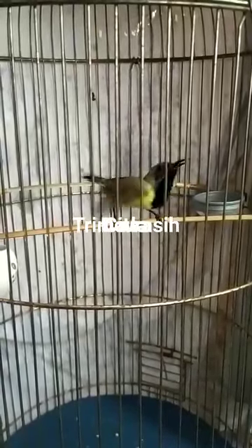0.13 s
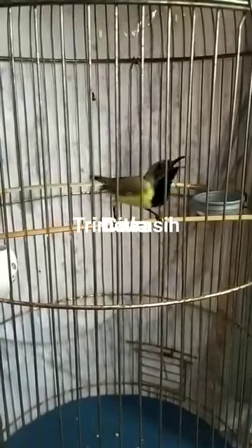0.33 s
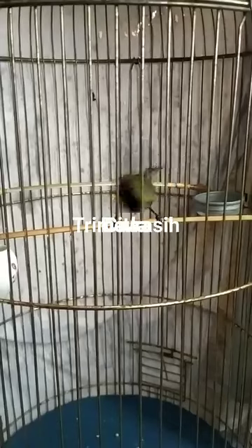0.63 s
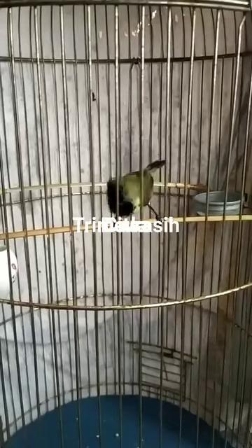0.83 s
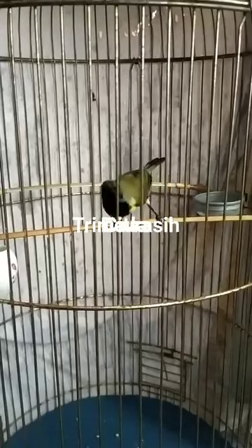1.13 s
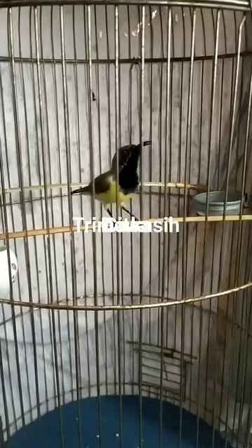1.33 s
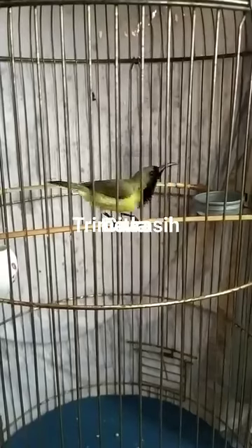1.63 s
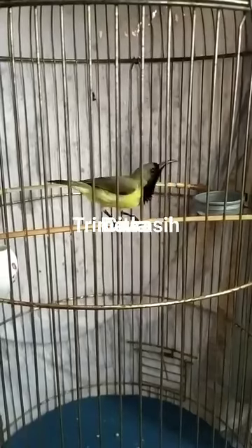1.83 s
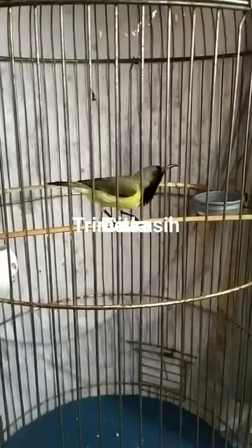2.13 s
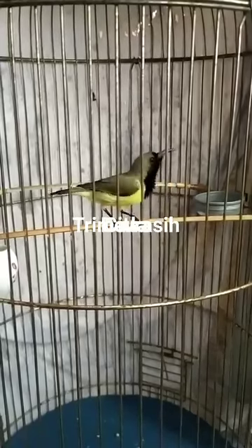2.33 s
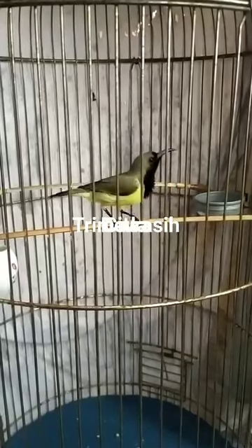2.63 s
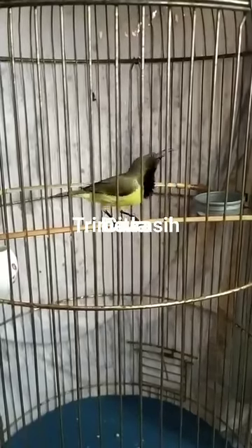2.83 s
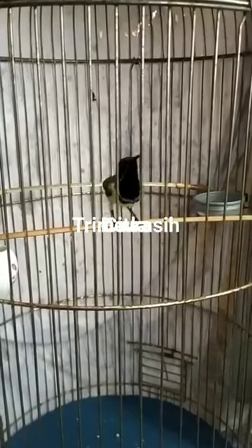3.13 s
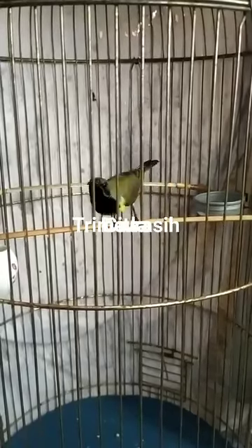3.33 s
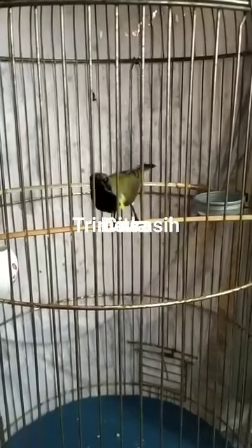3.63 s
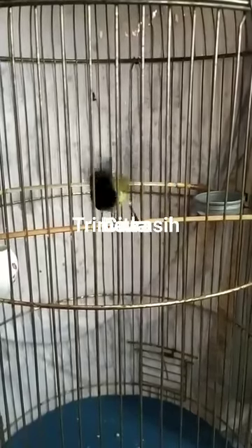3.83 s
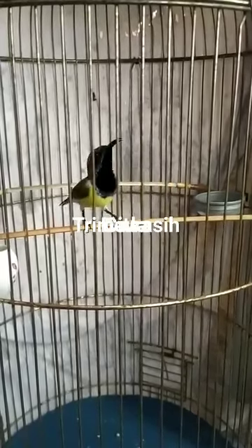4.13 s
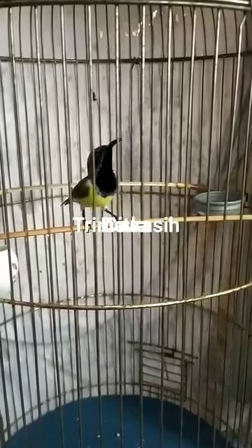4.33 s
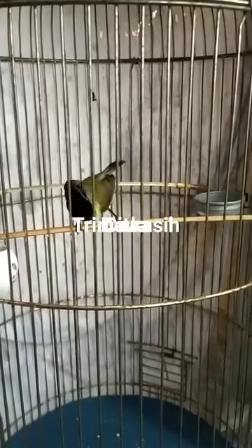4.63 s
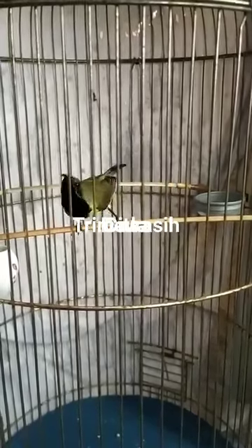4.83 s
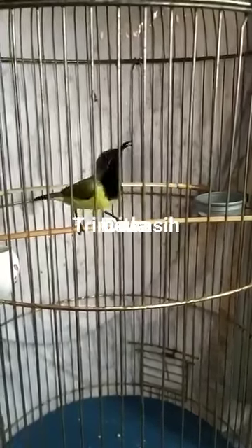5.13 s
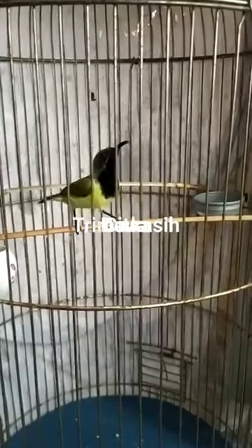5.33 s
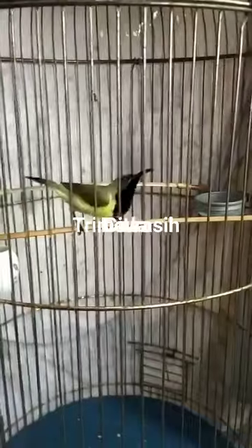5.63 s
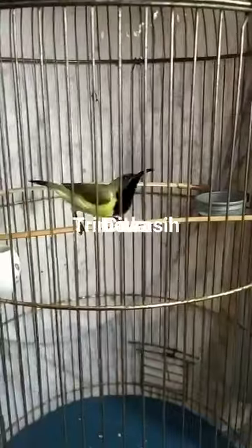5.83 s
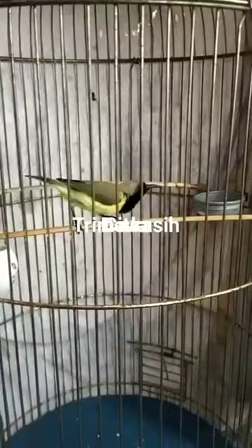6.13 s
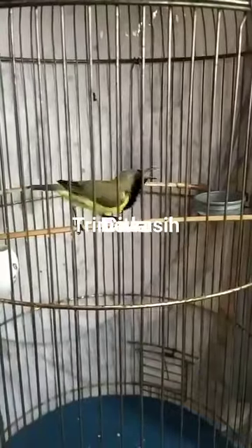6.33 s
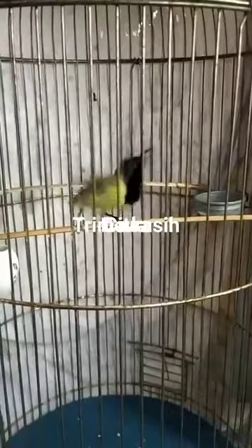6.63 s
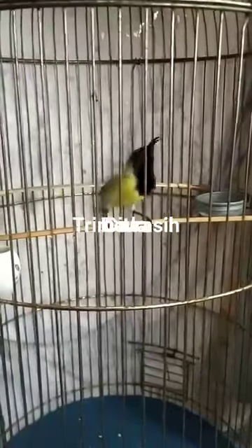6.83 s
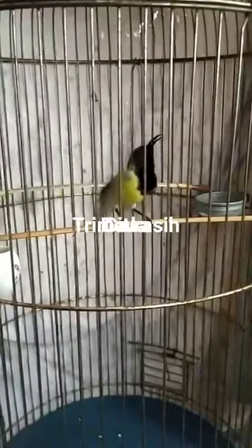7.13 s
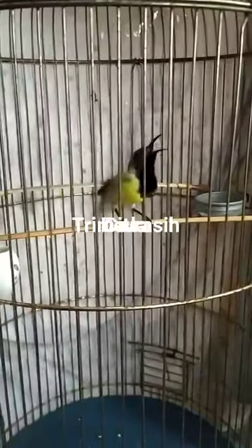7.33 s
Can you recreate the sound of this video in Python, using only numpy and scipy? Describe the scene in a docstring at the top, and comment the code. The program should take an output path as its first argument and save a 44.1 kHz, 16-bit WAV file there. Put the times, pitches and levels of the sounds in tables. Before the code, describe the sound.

A tiny bird sings close by in a small hard room. A loud, rapid, slightly raspy trill comes first, then a sharp chip among a run of soft falling chirps. More single chips follow, spaced out, over faint wavering whistles that break into hiss. A scratchy squeak leads into a second loud trill that lasts to the end. Low steady rumble and thin hiss lie underneath; close stereo microphone.

```python
"""A sunbird in a wire cage, close to a wall, sings two fast trills with sharp single chips between them.
Trills, chips and a squeak are nearly pure tones swept in pitch, with a rasp of air or harsh noise on many.
Also between the trills come soft falling chirps, and three whistles whose tone breaks up into hissing noise.
A small hard room adds random echoes, over a steady low rumble with a thin hiss, a rustle and a faint hum."""
import sys
import numpy as np
from scipy import signal
from scipy.fft import rfft, irfft
from scipy.io import wavfile
from scipy.ndimage import uniform_filter1d

SR = 44100
rng = np.random.default_rng(int(sys.argv[2]) if len(sys.argv) > 2 else 0)


def transcribe(signal):
    """Save signal, clipped to [-1, 1], as a 16-bit WAV file at the path in sys.argv[1]."""
    frames = np.atleast_2d(signal).T
    limited = np.clip(frames, -1, 1)
    pcm = np.round(limited * 32767).astype(np.int16)
    wavfile.write(sys.argv[1], SR, pcm)


N = 329868
TIME = np.arange(N) / SR

# trill syllables, in two groups: [t/s, top f/Hz, length/s]
TRILL_SYLLABLES = [(.030, 6900, .043), (.112, 6980, .042), (.193, 7000, .039), (.274, 6920, .043),
                   (.355, 6900, .044), (.437, 6850, .041), (.520, 6830, .042), (.611, 6650, .042),
                   (6.725, 6050, .036), (6.800, 6550, .038), (6.872, 7000, .037), (6.946, 7200, .039),
                   (7.022, 7270, .040), (7.098, 7250, .040), (7.173, 7250, .039), (7.248, 7280, .034),
                   (7.325, 7260, .044), (7.402, 7270, .036)]
# echo from cage and wall as the bird turns: [t/s, echo level/dB against the direct sound]
TURNING_ECHO = [(.4, -3.5), (.61, -3.5), (6.73, -6), (6.87, -0.5)]
# single chips: [t/s, relative level/dB, left over right/dB, phase lag of the right side/rad]
SINGLE_CHIPS = [(1.445, -11, 6, .9), (2.467, -11, 2.7, .8), (3.027, -11, 3.6, .6), (3.775, -12, 4.3, -2.3),
                (4.096, -11, 5.5, .2), (4.641, -15, 1.6, -2.5), (5.253, -13.3, 7.2, .1),
                (5.692, -12, 7, .1)]
# faint partials of a chip: [pitch factor, level/dB against the main tone]
FAINT_PARTIALS = [(0.348, -33), (1.659, -39.5), (2.301, -28.5)]
# a scratchy squeak in two parts: [t/s, level/dB, top f/Hz, length/s, pitch jitter as a share of f]
SQUEAK_PARTS = [(6.459, -27, 5750, .026, .09), (6.51, -18, 6400, .044, .014)]
# sweep shapes of the syllables, chips, falling chirps and squeak:
# [share of the length, pitch factor, relative level/dB]
SYLLABLE_SWEEP = [(0, .72, -6), (.07, .87, 0), (.17, .985, -1), (.3, 1, 1), (.48, .925, 2),
                  (.63, .815, 5.5), (.8, .69, 0), (1, .58, -12)]
CHIP_SWEEP = [(0, 1.06, -19), (.13, 1.0, -12), (.28, .915, -3), (.43, .895, 2.5), (.58, .925, -3),
              (.76, .985, -1), (1, 1.03, -9)]
FALLING_SWEEP = [(0, 1.06, -14), (.18, .98, 0), (.42, .84, 4), (.62, .75, -6), (1, .52, -16)]
SQUEAK_SWEEP = [(0, .78, -14), (.25, .88, -4), (.42, .97, 3), (.58, 1, -5), (.74, .96, 2), (1, .8, -6)]
# colour of the air that rasps along with a note: [f/Hz, relative level/dB per Hz]
RASP_COLOUR = [(700, -10), (2100, -4), (3700, -8), (5500, -4), (8000, -17), (10000, 1), (11000, -34.5),
               (13000, -3), (15000, -44)]
# starts of the falling chirps, a run that slows: [t/s]
CHIRP_TIMES = [1.383, 1.498, 1.589, 1.695, 1.794, 1.901, 2.008, 2.116, 2.231, 2.345, 2.468, 2.609]
# course of each of the three whistles: [t/s, f/Hz, relative level/dB, hoarseness 0-1]
WHISTLE_COURSES = [
    [(2.972, 2900, -42, .25), (3.05, 3720, -39, .3), (3.095, 3230, -36, .2), (3.17, 3450, -37, .12),
     (3.24, 2920, -39, .15), (3.3, 3200, -35, .08), (3.395, 3270, -34, .1), (3.46, 2950, -39, .7),
     (3.62, 2560, -39, .9), (3.8, 2750, -39, .95), (3.91, 3230, -37, .45), (4.025, 3200, -37, .35),
     (4.08, 3350, -45, .9), (4.16, 3250, -37, .6), (4.21, 2580, -42, .55), (4.29, 2460, -41, .3),
     (4.4, 2450, -48, .95), (4.55, 2650, -40, .4), (4.59, 2950, -43, .9), (4.76, 2720, -42, .8),
     (4.845, 1350, -54, .2)],
    [(5.154, 3050, -39, .25), (5.19, 3400, -32, .15), (5.248, 4200, -35, .25), (5.29, 3600, -29, .25),
     (5.345, 3600, -30, .4), (5.4, 3850, -31, .6), (5.52, 4350, -33, .95), (5.58, 4500, -48, 1)],
    [(5.855, 2400, -43, .3), (5.88, 3000, -29, .2), (5.93, 3150, -31, .7), (6.04, 4250, -35, .85),
     (6.19, 4250, -34, .9), (6.3, 3700, -34, .95), (6.6, 3300, -33, .95), (6.68, 2900, -48, 1)],
]
# where the whistles seem to come from: [t/s, left over right/dB]
WHISTLE_SIDES = [(3.3, -3.5), (4.3, -2), (5.2, -6), (5.5, 2.5), (5.88, -2), (6.15, 3.5), (6.4, -2.5)]
# escaping air: [start t/s, end t/s, break-up t/s, break-up length/s, relative level/dB, rise to the end/dB]
AIR_LEAKS = [(2.968, 4.89, 3.04, .12, -53, -1), (5.176, 5.585, 5.2, 0.13, -34.5, 1.5),
             (5.847, 6.689, 5.69, 0.14, -37.5, 6.5)]
# colour of hissing air, also used for the rustle and background: [f/Hz, relative level/dB per Hz]
HISS_COLOUR = [(400, -21.5), (1100, -13.5), (1700, -21.5), (2600, -8.5), (4700, -3), (7300, -9),
               (10000, -8), (12400, -18.5), (13600, -54)]
# how the echo tail dies away: [f/Hz, time to fall by 60 dB/s]
ROOM_DECAY = [(3000, 0.64), (6000, 0.39), (13000, 0.38)]
# soft rustle as the bird hops round: [t/s, relative level/dB]
HOP_RUSTLE = [(1.12, -73), (1.22, -50), (1.32, -44.5), (1.39, -43), (1.451, -43)]
# faint hollow hum: [t/s, level/dB]
HOLLOW_HUM = [(3.5, -74), (3.6, -56.5), (3.8, -50.5), (3.84, -88.5)]
# colour of the background rumble: [f/Hz, relative level/dB per Hz]
RUMBLE_COLOUR = [(22, -29), (65, -7), (123, -9.5), (202, -22), (317, -22), (1020, -31.5), (2570, -26.5),
                 (5490, -41), (6180, -31.5), (7300, -43.5), (9490, -44), (16100, -120)]
# how alike the rumble is at left and right: [f/Hz, likeness 0-1]
RUMBLE_LIKENESS = [(100, 1), (300, 0.81), (4000, 0.07)]

TRILL_DB, TRILL_HZ, EFFORT_DB = -12.5, 7290, 22.5  # a higher syllable takes more effort and is louder
# harsh edge of a syllable: it starts early and ends late by the lead time
GRIT_HZ, GRIT_WIDTH_HZ, GRIT_DB, GRIT_LEAD_S = 5800, 2600, -9.5, .014
GRIT_PER_ECHO = 0.8  # dB of harshness per dB of echo
CHIP_HZ = 6420  # the chip sweep multiplies this pitch
FALL_DB, FALL_HZ, TRAIL_DB, TRAIL_S = -35.5, 4540, -4.5, 0.12  # the last chirps get softer
FLUTTER_HZ, FLUTTER_DEPTH = 640, .7  # depth when fully hoarse
ATTACK_S, RELEASE_S = 0.0078, 0.11
CLEAN_HISS_DB = -11.5  # less air is wasted while the tone holds
RUMBLE_DB = -54.5
EDGE_HZ = 14600  # the final filter cuts the treble above this


def sunbird():
    """Trills, chips and the squeak; air or harsh noise sounds along with syllables and chips."""
    trills, chips, air, harsh = np.zeros((4, 2, N))
    for s, hz, length in TRILL_SYLLABLES:
        db = TRILL_DB + EFFORT_DB * (hz / TRILL_HZ - 1)
        echo_db = np.interp(s, *np.transpose(TURNING_ECHO))
        tone = note(SYLLABLE_SWEEP, hz, length, jitter=.013, overtone_db=-38).real
        add(trills, s, amp(db) * bounce(sides(4) * tone, echo_db, spread=.011))
        grit_db = db + GRIT_DB + GRIT_PER_ECHO * echo_db
        add(harsh, s - GRIT_LEAD_S, amp(grit_db) * puff(length + 2 * GRIT_LEAD_S))
        onset = sides(1.4) * catch(hz=2092, length=0.016, rough=0.064)
        add(trills, s - .014, amp(db - 16) * bounce(onset, echo_db, spread=0.007))
        add(air, s - .018, amp(db - 25.0) * puff(length + 0.035))
    for s, db, pan_db, phase in SINGLE_CHIPS:
        tone = note(CHIP_SWEEP, CHIP_HZ, length=.035, jitter=.007, overtone_db=-41)
        for factor, part_db in FAINT_PARTIALS:
            partial = note(CHIP_SWEEP, CHIP_HZ * factor, length=.035, jitter=.03, overtone_db=-np.inf)
            tone = tone + amp(part_db) * partial
        pair = np.real([tone, tone * np.exp(-1j * phase)])
        add(chips, s, amp(db - 1.0) * bounce(sides(pan_db) * pair, echo_db=-8, spread=0.011))
        add(air, s - .006, amp(db - 34.0) * puff(0.052))
    for s, db, hz, length, jitter in SQUEAK_PARTS:
        tone = note(SQUEAK_SWEEP, hz, length, jitter, overtone_db=-30).real
        add(trills, s, amp(db) * bounce(sides(3) * tone, echo_db=-5, spread=.015))
    return trills + harsh * grit() + air * noise(RASP_COLOUR, 0.47), chips


def note(sweep, top_hz, length, jitter, overtone_db, order=2):
    """A swept, nearly pure tone with at most one weak overtone; complex, so its phase can be turned."""
    u = np.linspace(0, 1, round(length * SR))
    share, pitch, db = np.transpose(sweep)
    hz = top_hz * uniform_filter1d(np.interp(u, share, pitch), size=120, mode="nearest")
    turn = np.exp(2j * np.pi * np.cumsum(hz * (1 + jitter * waver(len(u), 640))) / SR)
    envelope = evened(amp(np.interp(u, share, db)) * signal.windows.tukey(len(u), .1))
    return np.sqrt(2) * envelope * (turn + amp(overtone_db) * turn ** order)


def catch(hz, length, rough):
    """The low, rough catch of the voice just before a syllable; its third harmonic is strongest."""
    count = round(length * SR)
    rising_hz = hz * (np.linspace(.75, 1.2, count) + rough * waver(count, 510))
    phase = 2 * np.pi * np.cumsum(rising_hz) / SR
    harmonics_db = [-11.5, -15.5, 2.0, -9.5, -29.5]
    tone = sum(amp(db) * np.sin((k + 1) * phase) for k, db in enumerate(harmonics_db))
    return evened(tone * signal.windows.tukey(count, .6) * np.linspace(.4, 1, count))


def grit():
    """Harsh noise in part of the band through which the syllables sweep, with an unsteady level."""
    edges = [GRIT_HZ - GRIT_WIDTH_HZ / 2, GRIT_HZ + GRIT_WIDTH_HZ / 2]
    band = signal.butter(6, edges, "bandpass", fs=SR, output="sos")
    left, apart = signal.sosfilt(band, rng.standard_normal((2, N)))
    return sides(3) * evened(np.array([left, left + apart]) * amp(2.5 * waver(N, 150)))


def puff(length):
    """The smooth swell of air round one note."""
    return sides(0) * signal.windows.tukey(round(length * SR), .7)


def bounce(sound, echo_db, spread, count=10):
    """A few distinct echoes off cage and wall; their delays and signs are drawn anew for each call."""
    delay = (np.arange(count) + rng.uniform(0.11, 1, (2, count))) / count
    taps = np.zeros((2, round(spread * SR) + 1))
    size = rng.choice([-1., 1.], delay.shape) * amp(-9 * delay)
    np.put_along_axis(taps, (delay * spread * SR).astype(int), size, 1)
    # all echoes together never carry more energy than the direct sound
    taps *= amp(min(echo_db, 0)) / np.linalg.norm(taps, axis=1, keepdims=True)
    taps[:, 0] = 1
    return signal.fftconvolve(sound, taps / np.linalg.norm(taps[0]), axes=1)


def wheezes():
    """An air jet sings a tone while it holds; as it turns hoarse it flutters and spreads into hiss."""
    hz, gain, hoarse, pan_db = blowing()
    jitter = (.011 + .035 * hoarse) * waver(N, 250)
    phase = 2 * np.pi * np.cumsum(hz * (1 + jitter)) / SR
    overtones = (1 - hoarse) * (amp(-21) * np.sin(2 * phase) + amp(-26) * np.sin(1.5 * phase))
    # fast changes of level split the tone into side bands
    flutter = 1 + FLUTTER_DEPTH * hoarse * fuzzy(FLUTTER_HZ, width_hz=100)[0]
    tone = flutter * evened((np.sin(phase) + overtones) * amp(2.8 * waver(N, 60)))
    spray = fuzzy(hz * (1 + .03 * waver(N, 40)), width_hz=1350) * amp(1.2 * waver(N, 25))
    spray = spray + amp(-8) * fuzzy(hz, width_hz=2900)
    jet = sides(pan_db) * (np.sqrt(1 - hoarse) * tone + hoarse ** .9 * spray)
    sizzle = sides(2) * noise(HISS_COLOUR, .5) * amp(1.4 * waver(N, 70))
    return amp(-1) * gain * jet + amp(10.5) * leaking() * sizzle


def blowing():
    """The controls of the whistles: pitch, gain, hoarseness and left-right place."""
    s, hz, db, hoarse = np.vstack(WHISTLE_COURSES).T
    gain = sum(swell(*np.transpose(course)[[0, 2]]) for course in WHISTLE_COURSES)
    pan_db = np.interp(TIME, *np.transpose(WHISTLE_SIDES))
    return np.interp(TIME, s, hz), uniform_filter1d(gain, size=200), np.interp(TIME, s, hoarse), pan_db


def leaking():
    """Gain of the escaping air: it fades in, is louder once the tone has broken up, and fades out."""
    hiss = np.zeros(N)
    for start, end, break_s, break_length, hiss_db, rise_db in AIR_LEAKS:
        gate = np.clip((TIME - start) / ATTACK_S, 0, 1) * np.clip((end - TIME) / RELEASE_S, 0, 1)
        broken = np.clip((TIME - break_s) / break_length, 0, 1)
        slope_db = rise_db * np.interp(TIME, [start, end], [-.5, .5])
        hiss += gate * amp(hiss_db + slope_db + CLEAN_HISS_DB * (2.0 - broken))
    return hiss


def falling_chirps():
    """Quick downward sweeps off to the right, each slapped back by a wall."""
    out = np.zeros((2, N))
    for s in CHIRP_TIMES:
        db = FALL_DB + TRAIL_DB * np.exp((s - CHIRP_TIMES[-1]) / TRAIL_S)
        sweep = note(FALLING_SWEEP, FALL_HZ, length=.028, jitter=.04, overtone_db=-37, order=3)
        tone = amp(db) * sweep.real
        add(out, s, sides(-3.0) * tone)
        slap = bounce(sides(-0.85) * tone, echo_db=0, spread=0.028)
        add(out, s + 0.013, amp(-8.5) * slap)
    return out


def room(x, early_db, tail_db, early_t60):
    """Scattered early echoes off the near walls, then a diffuse tail that dies sooner in the treble."""
    count = SR * 3 // 4
    t = np.arange(count) / SR
    hits = rng.random((2, count)) < 900 / SR  # about 900 echoes per second
    early = rng.standard_normal((2, count)) * hits * (t > .004) * amp(-60 * t / early_t60)
    grains = rng.choice([-1., 1.], (2, count)) * np.clip(t / 0.0039 - 1, 0, 1)
    hz, at, z = signal.stft(grains, SR, nperseg=256)
    fading = z * amp(-60 * at / read(ROOM_DECAY, hz)[:, None])
    tail = signal.istft(fading, SR, nperseg=256)[1][:, :count]
    parts = [(early_db, early), (tail_db, tail)]
    echoes = sum(amp(db) * h / np.linalg.norm(h, axis=1, keepdims=True) for db, h in parts)
    return x + signal.oaconvolve(x, echoes, axes=1)[:, :N]


def background():
    """Filtered noise makes a low rumble, a thin hiss, the rustle of the hop and a brief hum."""
    likeness = read(RUMBLE_LIKENESS, np.fft.rfftfreq(N, 1 / SR))
    floor = amp(RUMBLE_DB) * noise(RUMBLE_COLOUR, likeness) + amp(-65.0) * noise(HISS_COLOUR)
    rustling = amp(-1.5) * fuzzy(4900, width_hz=1200) + amp(-8.0) * noise(HISS_COLOUR)
    rustle = swell(*np.transpose(HOP_RUSTLE)) * rustling
    return floor + rustle + swell(*np.transpose(HOLLOW_HUM)) * fuzzy(470, width_hz=80)


def noise(colour, same=0):
    """Stereo noise with a spectrum and a left-right likeness."""
    hz = np.fft.rfftfreq(N, 1 / SR)
    a, b = rfft(rng.standard_normal((2, N)))
    same = np.clip(same, -1, 1)
    pair = np.array([a, same * a + np.sqrt(1 - same ** 2) * b])
    return evened(irfft(pair * amp(read(colour, hz)), N))


def fuzzy(hz, width_hz):
    """Stereo noise in a narrow band that follows a pitch curve: slow noise shifted up to that pitch."""
    lowpass = signal.butter(3, width_hz / 2, fs=SR, output="sos")
    slow = signal.sosfilt(lowpass, rng.standard_normal((2, N)) + 1j * rng.standard_normal((2, N)))
    return evened((slow * np.exp(2j * np.pi * np.cumsum(hz * np.ones(N)) / SR)).real)


def waver(count, hz):
    """Smooth random drift of rms 1; changes faster than hz are damped."""
    f = np.fft.rfftfreq(count, 1 / SR)
    return evened(irfft(rfft(rng.standard_normal(count)) / (1 + (f / hz) ** 4), count))


def swell(s, db):
    """A gain curve through level points, practically silent outside them."""
    return amp(np.interp(TIME, s, db, left=-140, right=-140))


def sides(pan_db):
    """Left and right gains for a level difference; positive means louder on the left."""
    pair = np.array([amp(np.atleast_1d(pan_db) / 2), amp(-np.atleast_1d(pan_db) / 2)])
    return pair / np.sqrt(np.mean(pair ** 2, 0))


def add(mix, s, sound):
    """Mixes a stereo sound in at time s."""
    part = mix[:, max(round(s * SR), 0):][:, :sound.shape[1]]
    part += sound[:, :part.shape[1]]


def read(points, hz):
    """Reads a curve on a log-frequency axis."""
    f, value = np.transpose(points)
    return np.interp(np.log(hz + 1), np.log(f + 1), value)


def evened(x):
    """Scales to rms 1."""
    return x / np.sqrt(np.mean(x ** 2) + 1e-20)


def amp(db):
    """Decibels to gain."""
    return 10 ** (np.asarray(db) / 20)


def scene():
    """The bird is near and fairly dry; the softer sounds carry more of the room."""
    trills, chips = sunbird()
    near = room(trills, early_db=-9.5, tail_db=-18, early_t60=0.16)
    near = near + room(chips, early_db=-11.5, tail_db=-15.5, early_t60=0.037)
    far = room(falling_chirps(), early_db=0.0, tail_db=1.5, early_t60=0.087)
    far = far + room(wheezes(), early_db=-3, tail_db=-11.5, early_t60=0.062)
    return near + far + background()


def record(dry):
    """Clips any peak beyond full scale, then cuts the highest treble."""
    lowpass = signal.firwin(255, EDGE_HZ, window=("kaiser", 8), fs=SR)
    return signal.oaconvolve(np.clip(dry, -1, 1), lowpass[None], "same")


dry = scene()
out = record(dry)
transcribe(out)
```